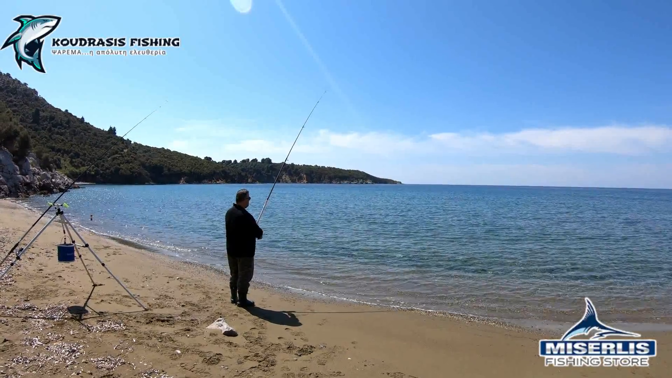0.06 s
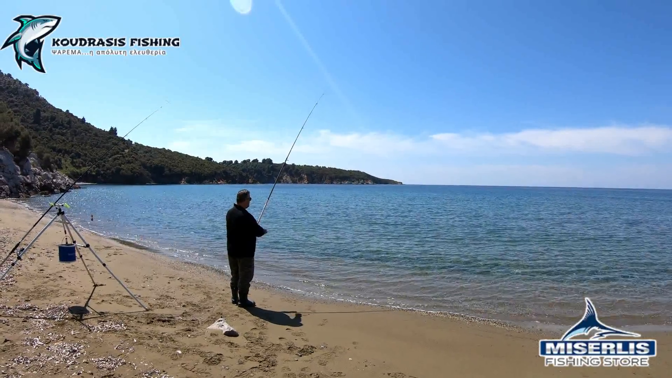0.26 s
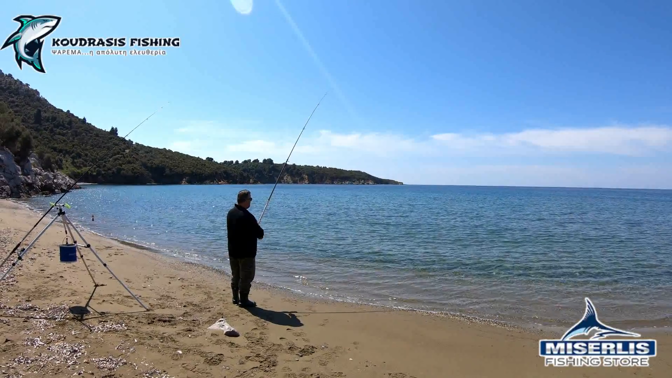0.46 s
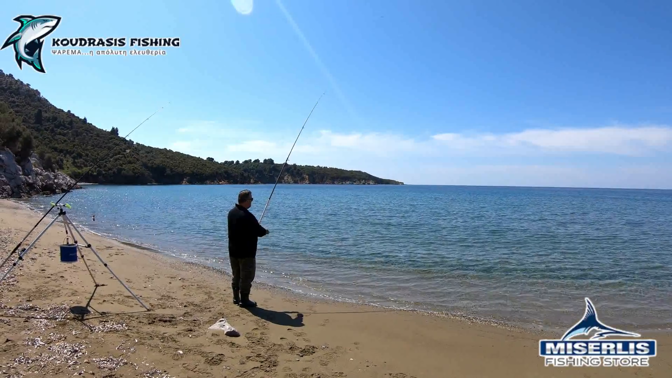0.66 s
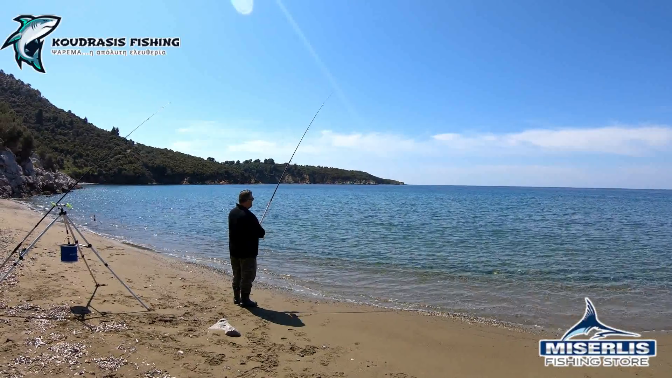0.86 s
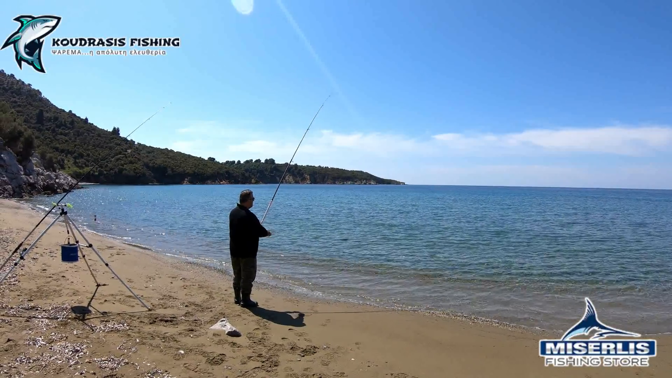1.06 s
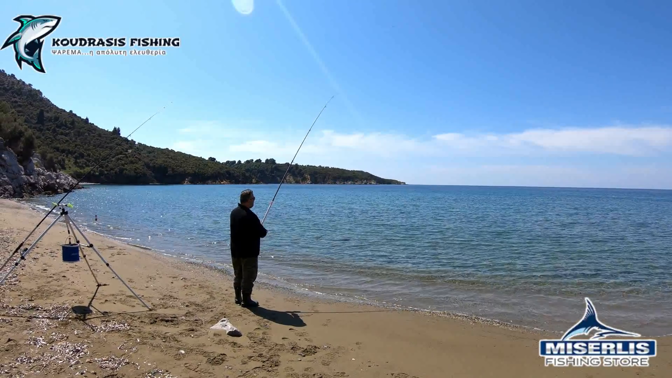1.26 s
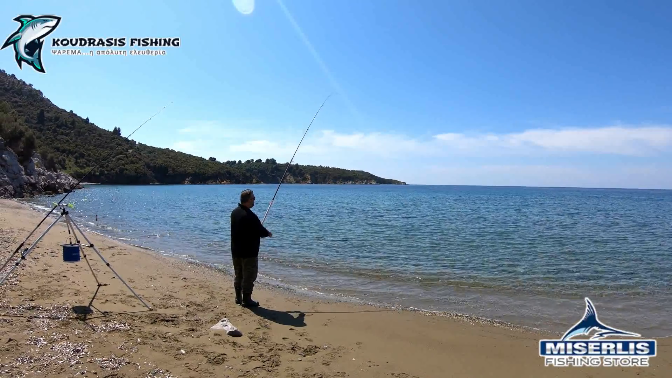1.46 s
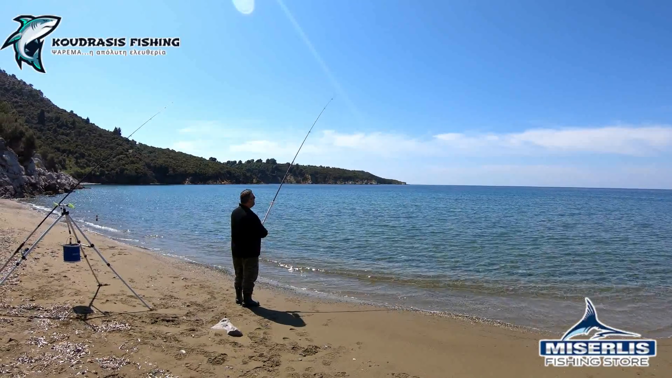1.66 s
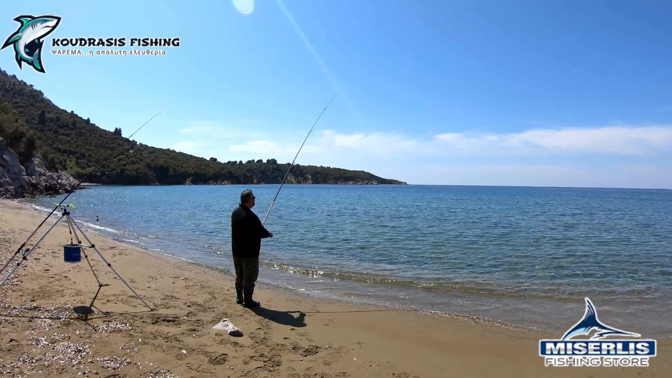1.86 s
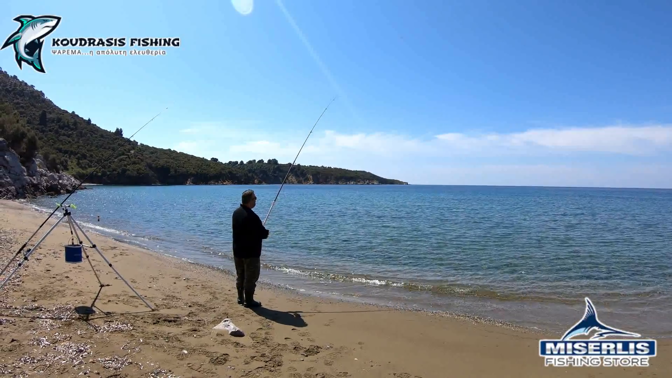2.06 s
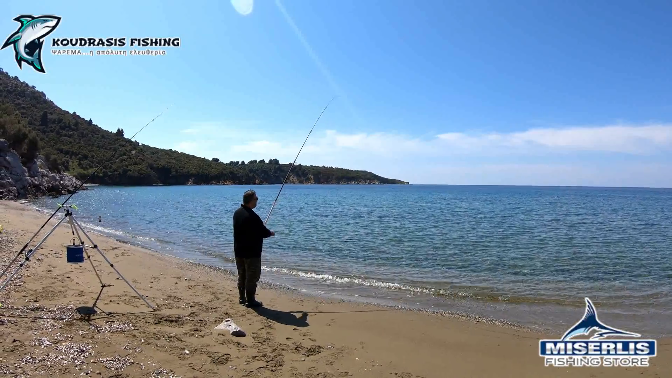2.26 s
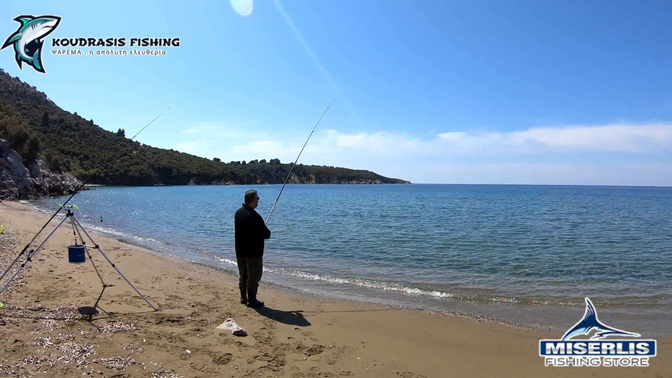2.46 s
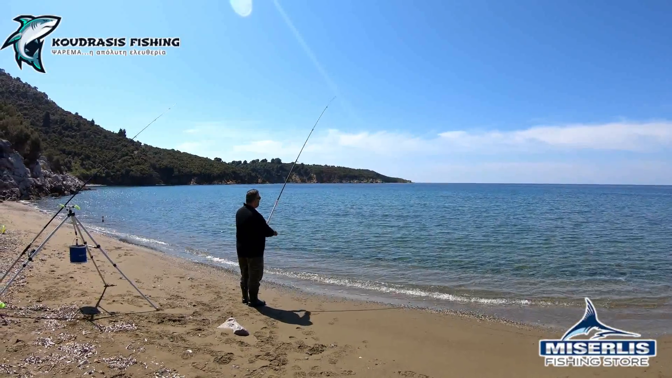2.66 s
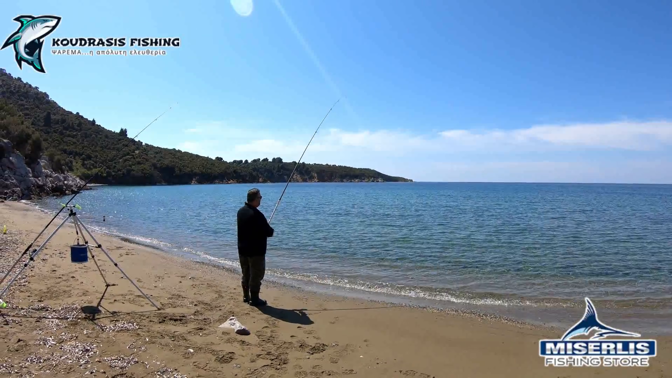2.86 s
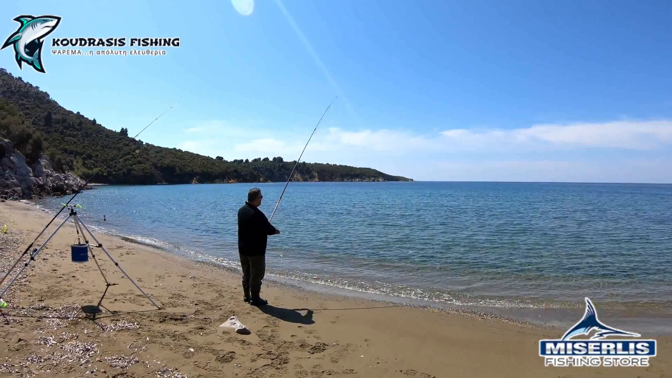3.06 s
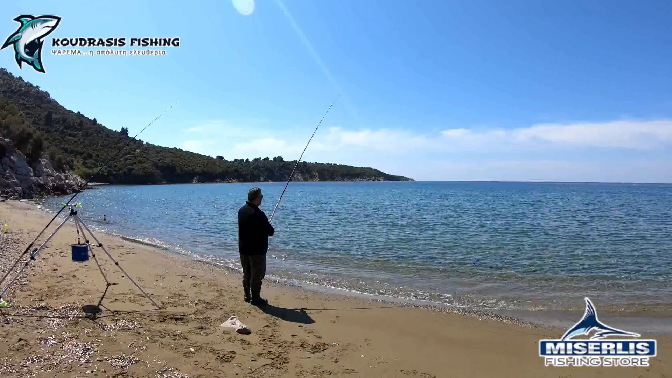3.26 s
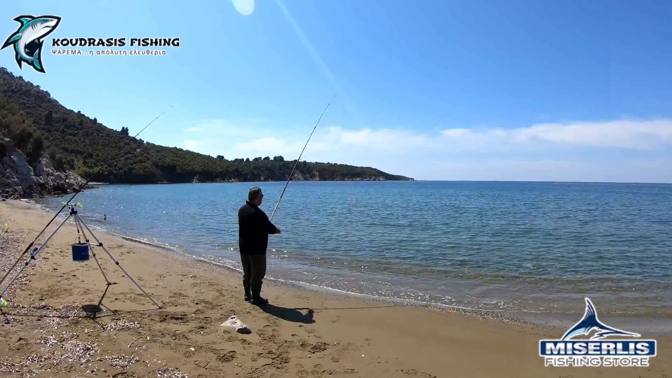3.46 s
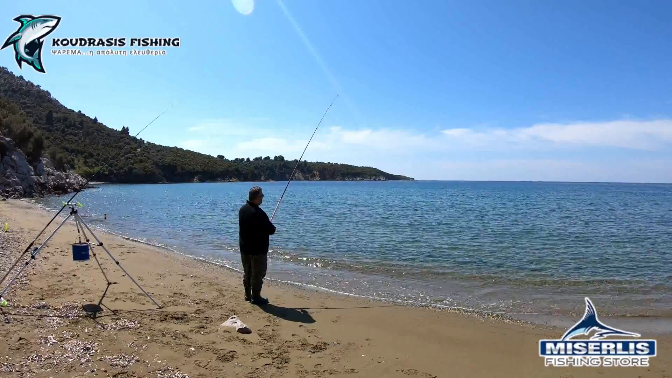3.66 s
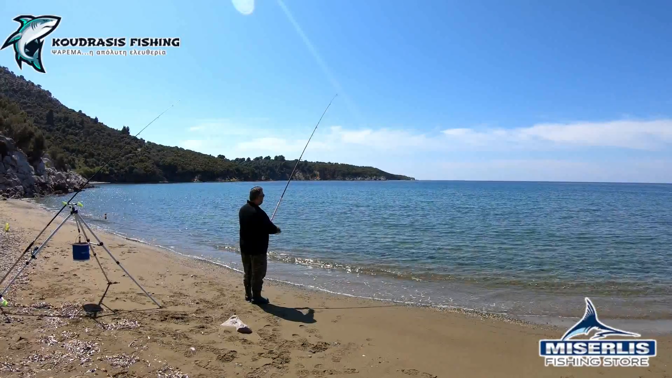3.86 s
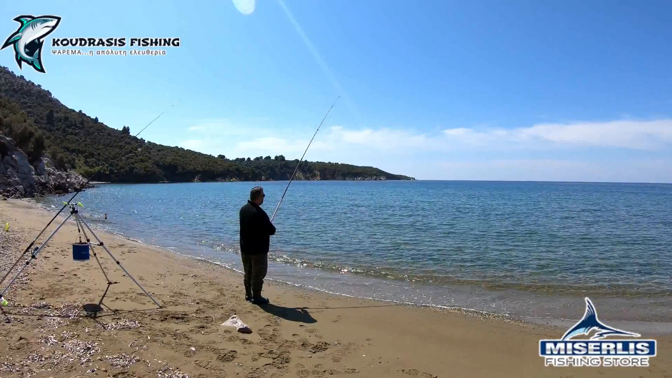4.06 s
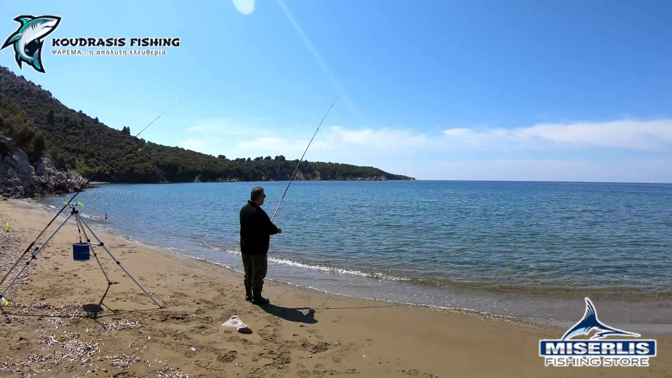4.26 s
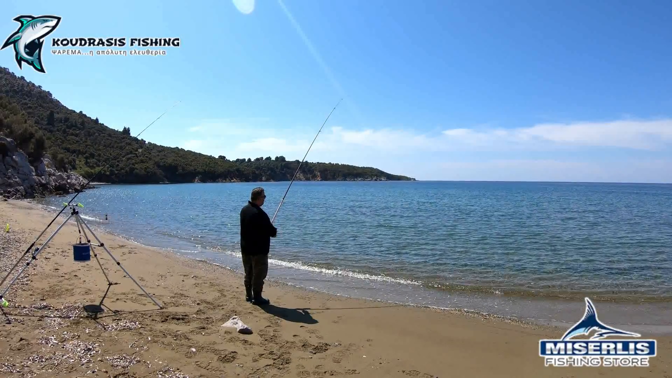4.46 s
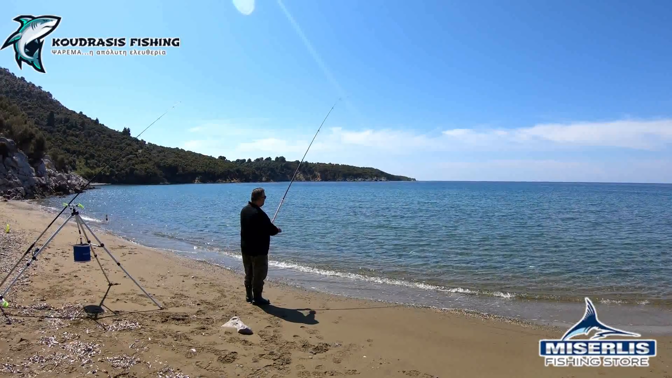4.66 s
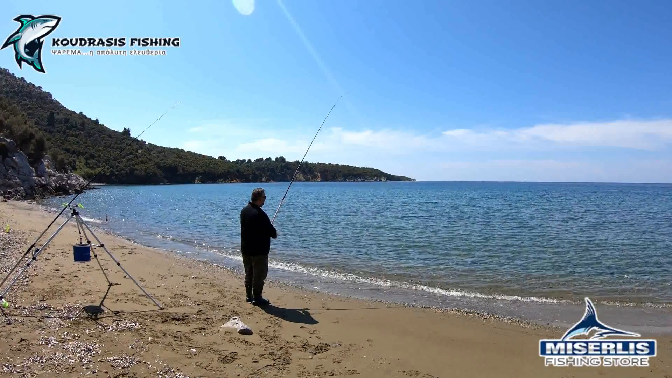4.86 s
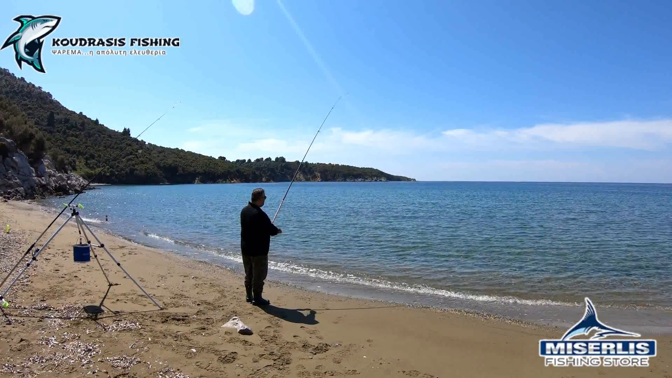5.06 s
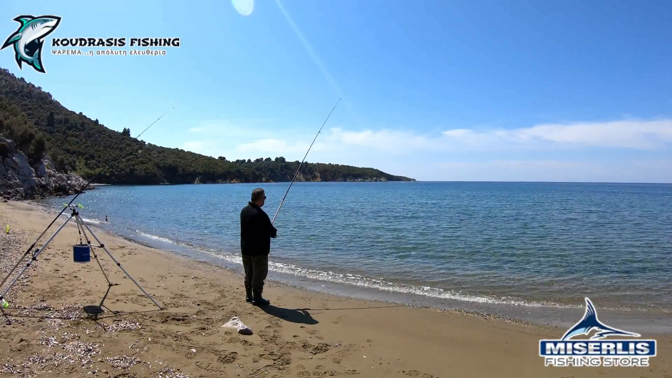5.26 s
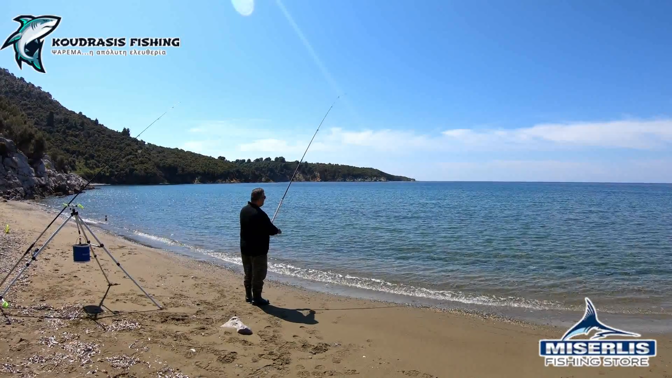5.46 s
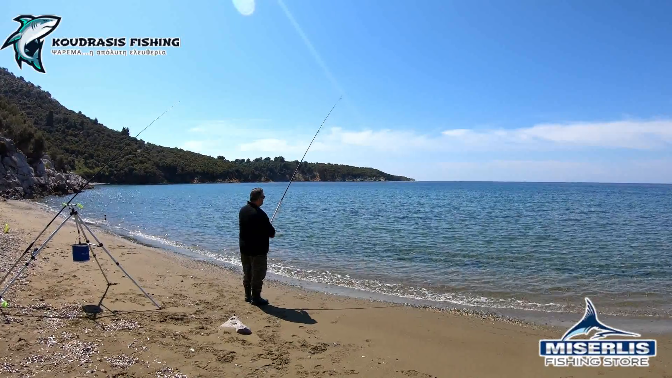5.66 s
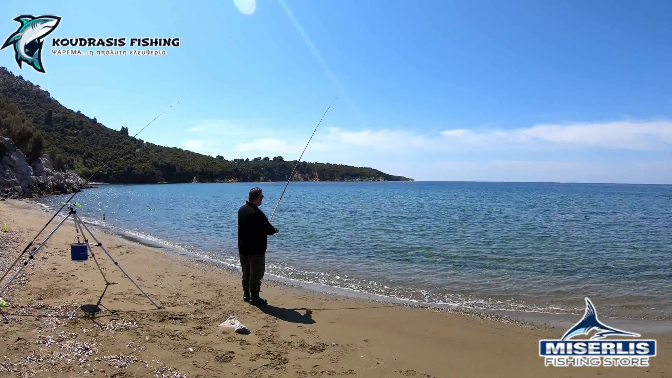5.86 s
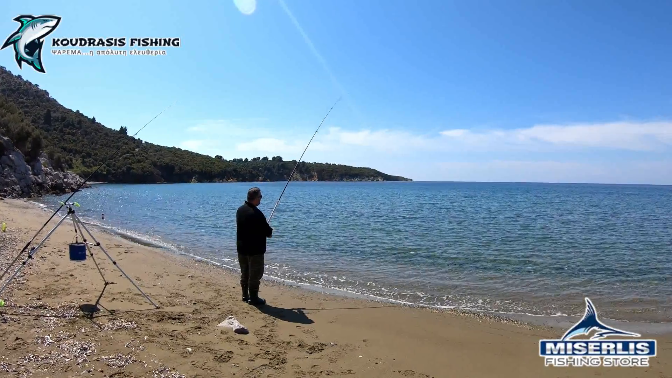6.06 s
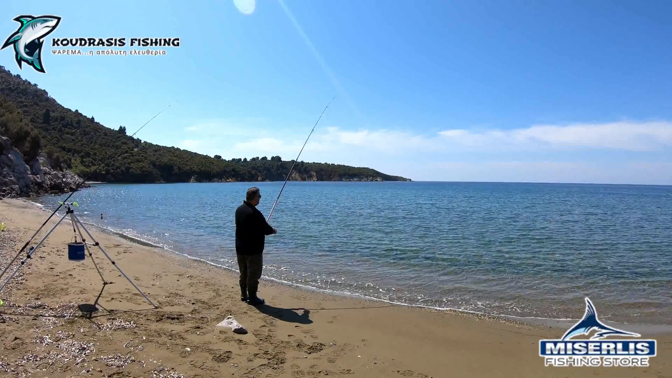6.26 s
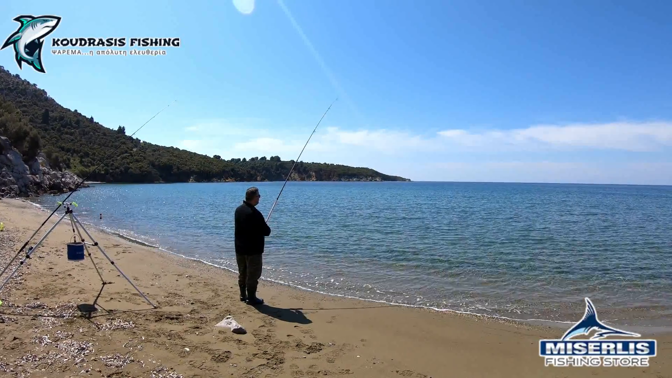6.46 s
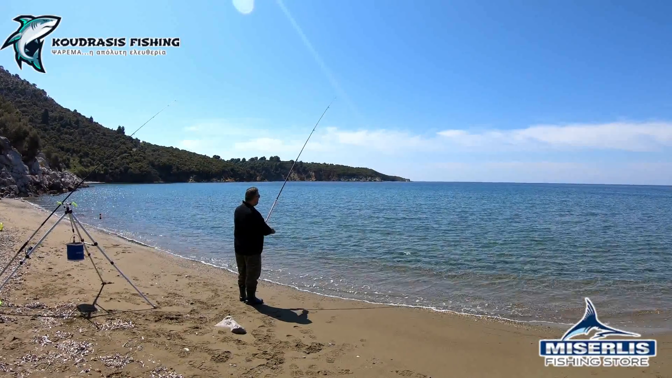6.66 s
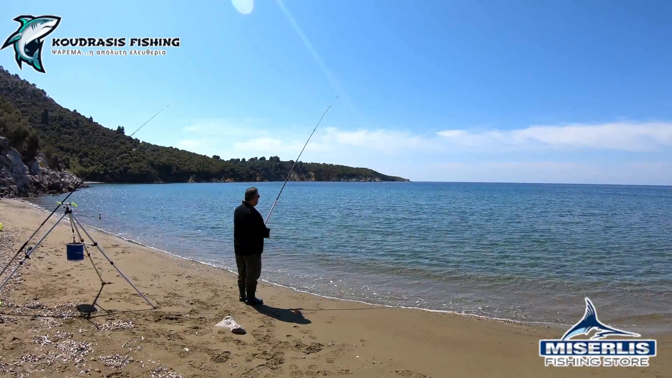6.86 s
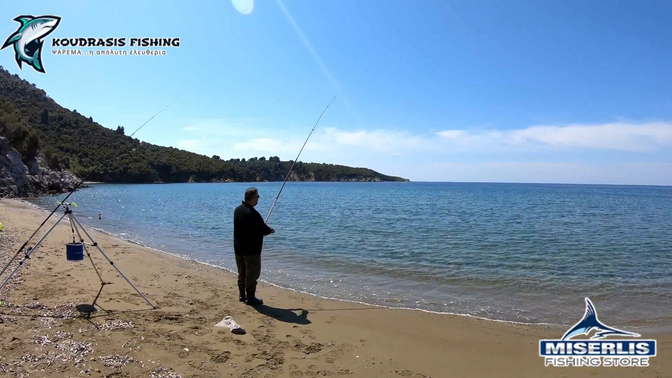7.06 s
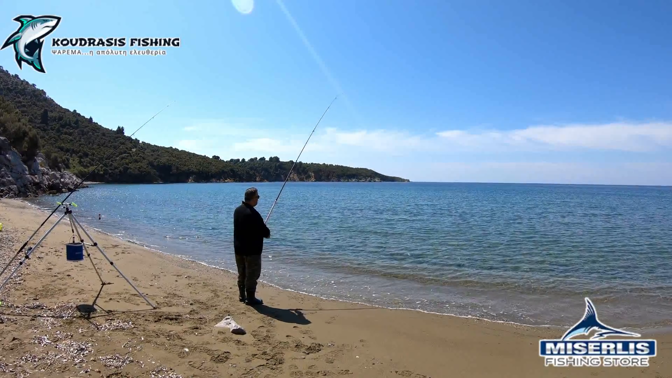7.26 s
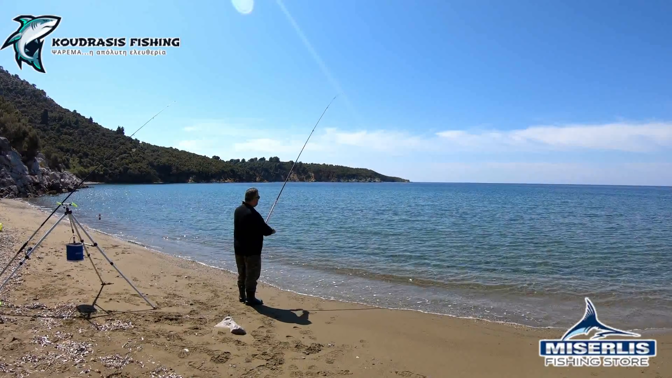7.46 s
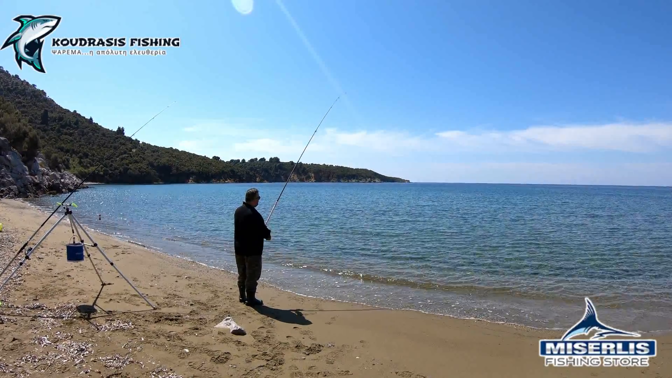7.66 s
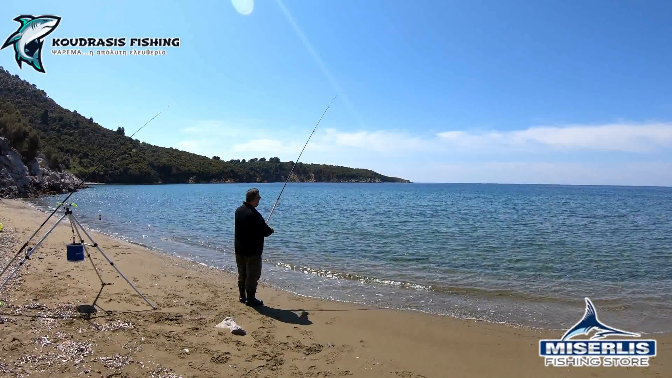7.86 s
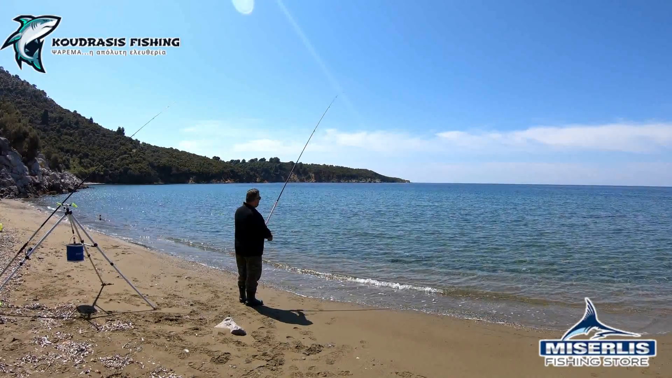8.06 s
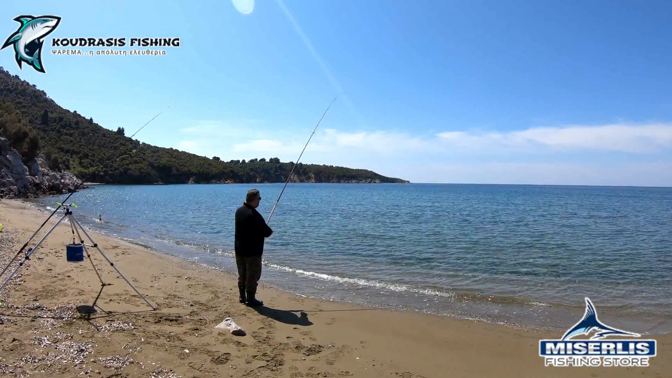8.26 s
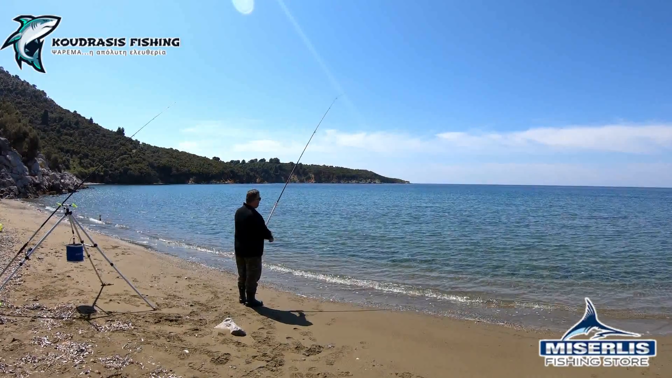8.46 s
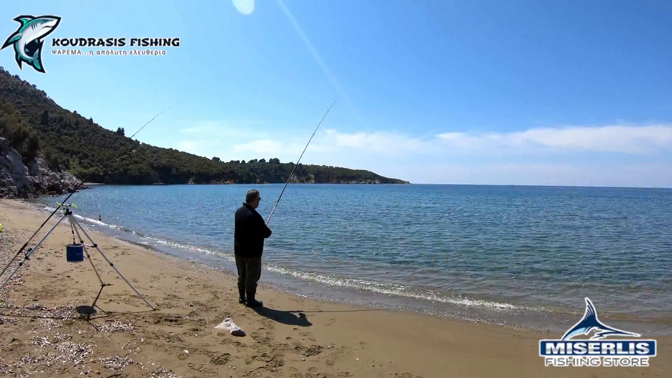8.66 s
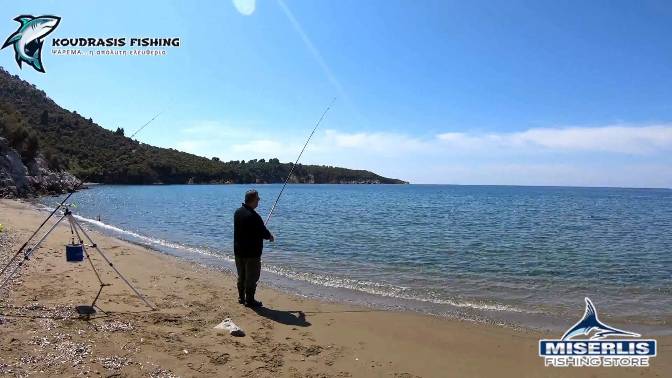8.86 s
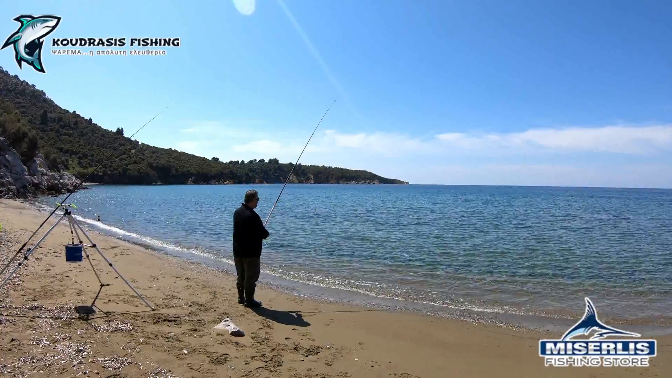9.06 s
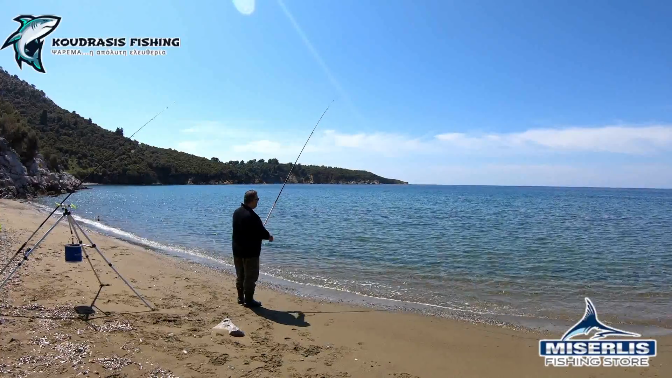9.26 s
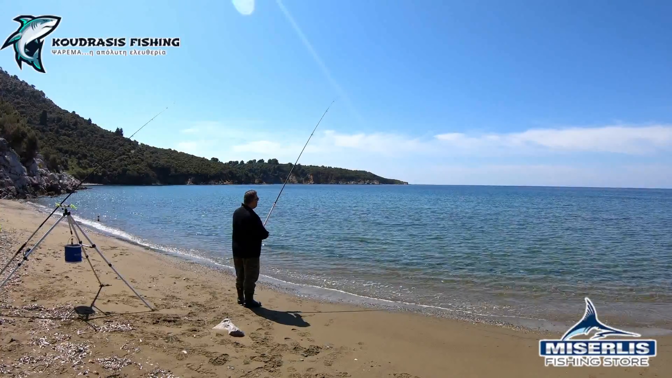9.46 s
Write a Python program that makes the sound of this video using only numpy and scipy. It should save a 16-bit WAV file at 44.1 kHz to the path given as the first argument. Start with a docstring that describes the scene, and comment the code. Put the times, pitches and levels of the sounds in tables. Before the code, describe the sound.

Small waves lap close to an exposed stereo microphone on an open beach. Quiet trickling foam rises into a breaking wash, recedes, and returns twice, the second sharper and the third gurgling and slapping. Low wind thuds and flutters throughout in irregular gusts, heavy on the left early, more balanced later. Water leans slightly left.

```python
"""Small waves on sand in gusty wind

Three small waves break close by: shaped noise and bubble swarms make the foam and its draining wash.
Trapped air is rising resonant noise, clear bubbles are damped rings, splashes and slaps are noise bursts.
Wind buffets two microphone ports, each in its own way: low noise shaped by gusts and quick shoves."""
import sys
import numpy as np
from scipy import signal
from scipy.io import wavfile
from scipy.ndimage import uniform_filter1d

SR = 44100
rng = np.random.default_rng(int(sys.argv[2]) if len(sys.argv) > 2 else 0)


def inscribe(sig):
    """Save sig as 16-bit PCM at rate SR to the path in sys.argv[1].

    A 1-D sig is mono; a 2-D sig holds one channel per row.
    Samples are clipped to [-1, 1] before scaling.
    """
    pcm = np.round(np.clip(np.atleast_2d(sig).T, -1, 1) * 32767)
    wavfile.write(sys.argv[1], SR, pcm.astype(np.int16))


N = 419203

# surf curves: (time [s], 600-3200 Hz level [dB], gurgle [dB], spray [dB], left over right [dB],
# 280-560 Hz roar level [dB])
SURF_CURVES = [(0.0, -57.5, -1, -11, 1, -70), (0.08, -61, -4, -9, -4, -77),
               (0.58, -60.5, 0.5, -9.5, -6, -76), (1.05, -56.5, -2, -12, -3, -73.5),
               (1.53, -55.5, -.5, -14, 0.5, -70), (1.74, -53.5, 0, -12.5, -0.5, -68.5),
               (1.93, -49.5, -2.5, -15.5, -3.5, -59.5), (2.3, -44.5, -1, -9.5, -3, -53.5),
               (2.43, -42.5, -2, -11.5, -4, -49), (2.81, -43, -2.5, -12, -5.5, -54),
               (3.1, -48, -2.5, -12.5, -4, -67.5), (3.31, -53.5, -2.5, -11.5, -4.5, -78),
               (3.6, -55.5, -2, -11.5, -8.5, -82), (4.1, -58.5, -2, -11.5, -4, -66),
               (4.37, -41, -2, -9.5, -2, -53.5), (4.52, -42.5, -1.5, -12, -2.5, -50.5),
               (4.92, -41, -1.5, -11.5, -6, -50.5), (5.6, -47, -2, -11.5, -7, -61.5),
               (5.92, -50.5, -2.5, -13.5, -2, -70), (6.19, -56, -3.5, -9, -0.5, -73),
               (6.41, -55.5, -9, -9.5, -3, -78), (6.75, -60, -8, -6.5, -2, -78),
               (7.17, -55.5, -3, -8.5, -6, -75), (7.36, -54.5, -1.5, -9.5, -9, -69.5),
               (7.53, -52.5, 6, -9, -11, -62), (7.78, -53, -1, -9, -11, -66),
               (8.07, -45.5, 3, -9, -7, -56.5), (8.23, -42.5, -2.5, -12, -4.5, -52),
               (9.3, -45.5, -0.5, -13, -0.5, -56), (9.45, -54, -4, -13, 2, -73)]
# colour of breaking foam: (frequency [Hz], relative density [dB per Hz])
BREAK_COLOUR = [(150, -34), (220, -4.5), (440, -7.5), (810, -4), (1350, -4.5), (1940, -7), (2740, -8.5),
                (3060, -10.5), (3450, -9.5), (3900, -15.5), (9800, -27), (10800, -42), (14500, -51),
                (15500, -58)]
# colour of draining wash: (frequency [Hz], relative density [dB per Hz])
DRAIN_COLOUR = [(150, -23.5), (500, -17), (700, -6.5), (1000, -6.5), (1600, -5.5), (2700, -6), (3500, -5.5),
                (4000, -11), (9800, -24.5), (10800, -37), (15500, -54)]
# left-right likeness of a wave breaking close by: (frequency [Hz], correlation [-1..1])
NEAR_LIKENESS = [(60, -0.04), (150, 0.17), (380, 1), (950, 0.44), (2380, 0.69), (5970, 0.65),
                 (15000, -0.43)]
# left-right likeness of the spread-out wash between waves: (frequency [Hz], correlation [-1..1])
LULL_LIKENESS = [(60, 0.04), (240, 0.46), (950, 0.0062), (3770, 0.44), (15000, 0.0043)]
# phase by which left leads in the surf: (frequency [Hz], lead [rad])
LEFT_LEAD = [(400, 0), (1120, .4), (4650, -.2), (7240, -1.2), (11600, -5)]
# lean of the surf to the left, added to its pan: (frequency [Hz], left over right [dB])
LEFT_LEAN = [(180, 7), (550, 0.5), (1650, 0), (5000, 2.5), (15000, 0.5)]
# wind on the ports: (time [s], relative strength [dB], left over right [dB], small fast eddies [dB])
WIND_CURVES = [(0.0, -42.5, 12, -1.5), (0.2, -44.5, 14, -6), (0.28, -35.5, 16, -6.5), (0.34, -49, 11, -2.5),
               (0.53, -51, 6, -1.5), (0.6, -40, 14, -9), (0.7, -36.5, 16, -7), (0.8, -40, 12, -6),
               (0.93, -35.5, 14, -3), (1.05, -36, 13, -3.5), (1.15, -47.5, 10, -1.5), (1.27, -43, 6, -5),
               (1.4, -54, 8, -7), (1.78, -49.5, 5.5, -5.5), (2.08, -55.5, 7, -8.5),
               (2.15, -43.5, 0.5, -2.5), (2.59, -38.5, -1.5, -11.5), (2.78, -45, -2.5, -8.5),
               (3.18, -40.5, 1, -10.5), (3.3, -39.5, 8, -1), (3.39, -37.5, 6, -7.5), (3.52, -49, 5, -2.5),
               (3.76, -45.5, 8, -6.5), (3.83, -60, 7, -2), (3.94, -38.5, 6.5, -8), (4.1, -53.5, -4, -3),
               (4.3, -53.5, 5, -11), (4.44, -39, 5, -10), (4.66, -53, 5, -8.5), (5.1, -43, 13, -7.5),
               (5.62, -54, -2.5, -8.5), (5.84, -73, 4, -8), (6.33, -39, -3.5, -9.5), (6.65, -52.5, 2.5, -7),
               (6.77, -44, 1, -13), (6.96, -72, 2, 15), (7.22, -43.5, -3, -10.5), (7.6, -38, -3, -10),
               (7.83, -53.5, -1, -7), (7.97, -38, -5, -5.5), (8.58, -44.5, 1, -9), (8.74, -38.5, -4, -10),
               (9.05, -42, 2, -7.5), (9.2, -49, 7, -7), (9.51, -44.5, 4, -3)]
# colour of a strong gust: (frequency [Hz], relative density [dB per Hz])
GUST_COLOUR = [(5.9, -55), (10, -11), (51, 7.5), (87, 0), (102, -1.5), (139, -8), (173, -12.5),
               (321, -34.5), (379, -37.5), (500, -38.5), (650, -66), (1100, -120)]
# clear single bubbles: (time [s], peak [dB], pitch [Hz], left over right [dB])
CLEAR_BUBBLES = [(0.441, -54, 1640, -6.0), (0.566, -55, 1490, -15), (1.786, -47, 730, 0.0),
                 (2.329, -36, 750, -8), (2.356, -34, 820, -5), (2.419, -35.5, 506, 0),
                 (3.499, -51, 725, -11), (3.603, -48, 1240, -12), (3.782, -56, 2300, -6),
                 (3.832, -52, 1280, -8), (3.842, -54, 745, -7), (3.891, -52, 2380, -6),
                 (3.946, -51, 1190, -5), (3.991, -53, 1110, -10), (4.029, -53.5, 2570, -14),
                 (4.158, -49, 2030, -7), (4.196, -48, 1640, -2.5), (4.205, -46, 1400, -2.5),
                 (4.383, -32.5, 970, -4), (4.437, -38, 2020, 1), (4.588, -34.5, 650, -4),
                 (4.625, -35.5, 875, -6), (4.732, -34, 810, -17), (4.746, -38, 950, -15),
                 (4.755, -41, 1320, -10), (4.777, -38, 1740, -6), (6.779, -54, 690, 3),
                 (7.379, -52, 880, -13), (7.465, -50, 1420, -14), (7.497, -54, 730, -8),
                 (7.514, -51, 1170, -12), (7.548, -48, 730, -10), (7.607, -46, 1190, -14),
                 (7.65, -50, 920, -12), (7.662, -44.5, 655, -9), (7.809, -46.5, 870, -21),
                 (8.144, -34, 1520, -6.5), (8.444, -30.5, 393, -1), (8.522, -40, 970, -4),
                 (9.107, -39.5, 764, 5)]
# splashes of thrown droplets: (time [s], peak [dB], left over right [dB])
SPLASHES = [(2.012, -56, -2.5), (4.153, -43, 0.0), (4.193, -41.5, -1.5), (4.238, -40, 1), (4.258, -39, 0.0),
            (4.306, -38, 1), (4.34, -33.5, -0.5), (5.722, -47, -20), (6.825, -50, -2), (6.853, -43, -4),
            (7.657, -46, -15), (8.563, -38, -1.5), (8.779, -44, -7)]
# air trapped under falling crests: (time [s], length [s], starting level [dB], starting pitch [Hz])
AIR_POCKETS = [(2.081, 0.66, -49.5, 214.4), (4.28, 0.65, -40.5, 179), (7.999, 0.62, -45, 180)]
# slaps of water on water: (time [s], peak [dB], left over right [dB])
WATER_SLAPS = [(4.06, -53, -2), (8.427, -36, -1)]

# gurgle and spray at which each foam colour holds
BREAK_GURGLE_DB, DRAIN_GURGLE_DB = -1.5, -3.5
BREAK_SPRAY_DB, DRAIN_SPRAY_DB = -11.5, -8.5
PLOP_SPAN_S, PLOP_RISE = 0.0046, 0.04  # envelope time scale; fractional pitch climb per span
POCKET_RISE_OCT, POCKET_FADE_DB = 0.7, -16.5  # over the life of a pocket
SLAP_T60_S = 0.052
EDGE_HZ = 15300


def gain_of(db):
    """Decibels to amplitude."""
    return 10 ** (np.asarray(db) / 20)


def evened(x):
    """Scaled to rms 1."""
    return x / np.sqrt(np.mean(x ** 2) + 1e-20)


def read(points, hz):
    """A spectrum table read on a log-frequency axis."""
    f, value = np.transpose(points)
    return np.interp(np.log(hz + 1), np.log(f + 1), value)


def follow(rows, t):
    """Every column of a curve table read at the times t."""
    s, *columns = np.transpose(rows)
    return [np.interp(t, s, c) for c in columns]


def add(mix, s, sound):
    """Mixes a sound in at s seconds."""
    part = mix[:, round(s * SR):][:, :sound.shape[1]]
    part += sound[:, :part.shape[1]]


def panned(sound, db, pan_db):
    """A mono sound at a level, its pan split evenly between left and right."""
    return gain_of([[db + pan_db / 2], [db - pan_db / 2]]) * sound


def patches(shape, bins, frames):
    """Random blotches over frequency and time, rms 1."""
    z = rng.standard_normal(shape)
    for _ in range(2):
        z = uniform_filter1d(z, size=bins, axis=-2)
        z = uniform_filter1d(z, size=frames, axis=-1)
    return evened(z)


def bubble(hz, cycles, rise):
    """A damped ring whose pitch climbs as the bubble nears the surface, peak about 1."""
    u = np.arange(int(3 * cycles / hz * SR) + 8) * hz / cycles / SR  # time in spans
    envelope = 2 * np.e * u * np.exp(-2 * u)
    return envelope * np.sin(2 * np.pi * cycles * (u + rise * u ** 2 / 2))


def swarm(count, lo_hz, hi_hz, cycles, spread_db, slope):
    """Bubbles of random size, strength and place, spread over two streams, rms 1."""
    small, long = rng.random(size=(2, 400))
    hz = lo_hz * (hi_hz / lo_hz) ** small
    kinds = [(f / 1000) ** slope * bubble(f, cycles * (0.43 + l), 0.039) for f, l in zip(hz, long)]
    out = np.zeros((2, N))
    for when, kind, loud, place in rng.random((count, 4)):
        side = np.array([[np.cos(np.pi * place)], [np.sin(np.pi * place)]])
        gain = gain_of(-spread_db * np.log(1 - 0.98 * loud))  # few are loud
        add(out, when * N / SR, gain * side * kinds[int(kind * len(kinds))])
    return evened(out)


def foam():
    """Hiss of the finest bubbles, gurgling larger ones, scattered blips and crackling spray."""
    hiss = rng.standard_normal((2, N))
    gurgle = swarm(count=10000, lo_hz=448.7, hi_hz=4995, cycles=7.5, spread_db=2.0, slope=0.66)
    blips = swarm(count=700, lo_hz=602.0, hi_hz=2808, cycles=11.9, spread_db=2.5, slope=0.63)
    crackle = swarm(count=3000, lo_hz=3840, hi_hz=10460, cycles=3.6, spread_db=0.5, slope=1.0)
    return hiss + gain_of(-13.0) * gurgle + gain_of(-23.5) * blips + gain_of(-10.5) * crackle


def blend(share, loud, soft):
    """Linear mix of two settings."""
    return share * loud + (1 - share) * soft


def surf():
    """Foam coloured, swelled and spread over the two ports as each wave rises and drains."""
    hz, t, (a, b) = signal.stft(evened(foam()), SR, nperseg=512, noverlap=384)
    level_db, gurgle_db, spray_db, pan_db, roar_db = follow(SURF_CURVES, t)

    # gurgle sets the share of breaking colour
    breaking = np.clip((gurgle_db - DRAIN_GURGLE_DB) / (BREAK_GURGLE_DB - DRAIN_GURGLE_DB), -0.3, 1.6)
    colour_db = blend(breaking, read(BREAK_COLOUR, hz)[:, None], read(DRAIN_COLOUR, hz)[:, None])

    def band_db(lo_hz, hi_hz):
        power = gain_of(colour_db[(hz > lo_hz) & (hz < hi_hz)]) ** 2
        return 10 * np.log10(power.sum(0) / len(hz))

    octave = np.log2((hz[:, None] + 1) / 1000)
    low = np.clip((-0.6 - octave) / 0.3, 0, 1)
    high = np.clip((octave - 1.3) / 0.85, 0, 1.3)
    body_db = level_db - band_db(600, 3200)
    deep_db = roar_db - band_db(280, 560)
    spray_lift_db = spray_db - blend(breaking, BREAK_SPRAY_DB, DRAIN_SPRAY_DB)
    colour_db += body_db + low * (deep_db - body_db) + high * spray_lift_db

    # clumps of foam burst in patches, and splashes flicker over wide bands
    lumps_db = 0.42 * patches(a.shape, 5, 9)
    lumps_db += 0.5 * patches(a.shape, 80, 3) + 0.52 * patches(a.shape, 60, 10)
    # below the spray the water sloshes in small lumps
    lumps_db += 1.28 * np.clip(1 - high, 0, 1) * patches(a.shape, 3, 7)

    near = np.clip((level_db + 56.0) / 12, 0, 1)  # a loud wave is one close source
    same = blend(near, read(NEAR_LIKENESS, hz)[:, None], read(LULL_LIKENESS, hz)[:, None])
    same = np.clip(same, -1, 1)
    right = same * a + np.sqrt(1 - same ** 2) * b
    right = right * np.exp(-1j * read(LEFT_LEAD, hz))[:, None]
    half_gain = gain_of((read(LEFT_LEAN, hz)[:, None] + pan_db) / 2)
    z = np.array([a * half_gain, right / half_gain]) * gain_of(colour_db + lumps_db)
    return signal.istft(z, SR, nperseg=512, noverlap=384)[1][:, :N]


def wind():
    """Eddies push each port on its own; small eddies sound higher than large ones."""
    hz, t, z = signal.stft(rng.standard_normal((2, N)), SR, nperseg=2048, noverlap=1792)
    keep = hz < 900
    low_hz = hz[keep, None]
    small_db = follow(WIND_CURVES, t)[2]
    tilt_db = 0.6 * (small_db + 6) * np.clip(np.log2((low_hz + 1) / 45), 0, 1.3)
    colour_db = read(GUST_COLOUR, low_hz / 2 ** (0.038 * (small_db + 7)))  # small eddies shift it up
    z[:, keep] *= gain_of(colour_db + tilt_db + 1.64 * patches(z[:, keep].shape, 2, 9))
    # the right port sheds the deepest eddies
    z[1, keep] *= gain_of(2.0 * np.clip(np.log2((low_hz + 1) / 55), -1.5, 0))
    z[:, ~keep] = 0
    rumble = signal.istft(z, SR, nperseg=2048, noverlap=1792)[1][:, :N]
    rumble /= np.sqrt(uniform_filter1d(rumble ** 2, size=8000, axis=1) + 1e-20)  # level evened

    strength_db, pan_db, _ = follow(WIND_CURVES, np.arange(N) / SR)
    # unrelated ports add in power
    port = 2 * gain_of(strength_db) / np.sqrt(1 + gain_of([-2 * pan_db, 2 * pan_db]))
    shoves = patches((2, 1, N // 256 + 2), 1, 5)[:, 0]  # quick shoves within a gust
    shoves = np.array([np.interp(np.arange(N) / 256, np.arange(len(v)), v) for v in shoves])
    # shoves top out; slack moments go deep
    shove_db = 5.9 * np.minimum(np.tanh(shoves / 1.5), 0.6) + 0.73
    return rumble * port * gain_of(shove_db)


def plops():
    """Clear single bubbles, each a damped ring climbing in pitch."""
    out = np.zeros((2, N))
    for s, db, hz, pan_db in CLEAR_BUBBLES:
        add(out, s, panned(bubble(hz, hz * PLOP_SPAN_S, PLOP_RISE), db, pan_db))
    return out


def burst(envelope, lo_hz, hi_hz):
    """Band-passed noise under an envelope, peak 1."""
    noise = rng.standard_normal(len(envelope)) * envelope
    noise = signal.sosfilt(signal.butter(4, [lo_hz, hi_hz], "bandpass", fs=SR, output="sos"), noise)
    return noise / abs(noise).max()


def splashes():
    """Thrown droplets: puffs of noise with a fast decay and a weaker, slower tail."""
    t = np.arange(3000) / SR
    decay = gain_of(-60 * t / 0.017) + gain_of(-15 - 60 * t / 0.17)
    out = np.zeros((2, N))
    for s, db, pan_db in SPLASHES:
        add(out, s, panned(burst(np.minimum(t / 0.0022, 1) * decay, 1400, 6200), db, pan_db))
    return out


def pocket(length_s, db, start_hz):
    """Noise through a narrow resonance, rising in pitch as the trapped air is squeezed out."""
    life = np.arange(0, 1, 1 / (length_s * SR))
    hz = start_hz * 2 ** (POCKET_RISE_OCT * life ** 0.7)
    r = np.exp(-np.pi * 90 / SR)
    slow = rng.standard_normal(len(life)) + 1j * rng.standard_normal(len(life))
    for _ in range(2):
        slow = signal.lfilter([1 - r], [1, -r], slow)
    ring = evened((slow * np.exp(2j * np.pi * np.cumsum(hz) / SR)).real)  # moved up to the pitch
    ring = gain_of(db + POCKET_FADE_DB * life) * ring * signal.windows.tukey(len(life), 0.3)
    return panned(ring, 0, -0.8)


def pockets():
    """Gulps of air trapped under each falling crest."""
    out = np.zeros((2, N))
    for s, length_s, db, start_hz in AIR_POCKETS:
        add(out, s, pocket(length_s, db, start_hz))
    return out


def slaps():
    """Water on water: short wide bursts of noise."""
    t = np.arange(3000) / SR
    envelope = np.minimum(t / 0.0084, 1) * gain_of(-60 * t / SLAP_T60_S)
    out = np.zeros((2, N))
    for s, db, pan_db in WATER_SLAPS:
        add(out, s, panned(burst(envelope, 550, 3800), db, pan_db))
    return out


def scene():
    """Water and wind at the two ports."""
    return surf() + wind() + plops() + splashes() + pockets() + slaps()


def record(dry):
    """Band limit: a linear-phase low-pass at EDGE_HZ."""
    lowpass = signal.firwin(511, EDGE_HZ, window=("kaiser", 9), fs=SR)
    return signal.oaconvolve(dry, lowpass[None], "same")


dry = scene()
out = record(dry)
inscribe(out)
```